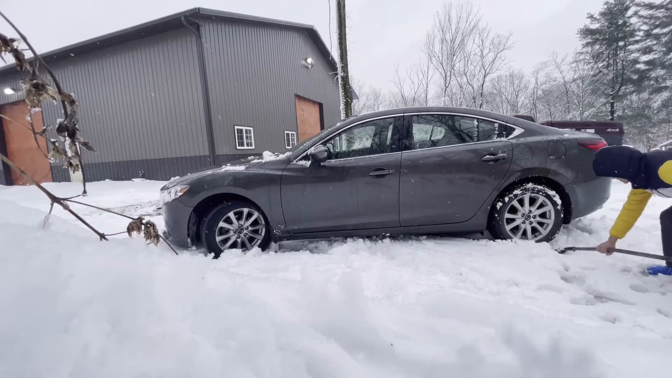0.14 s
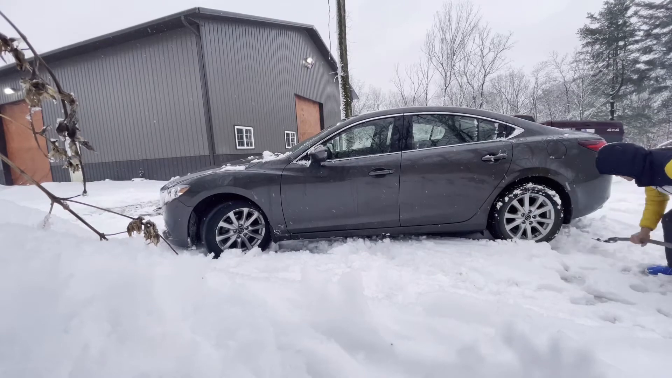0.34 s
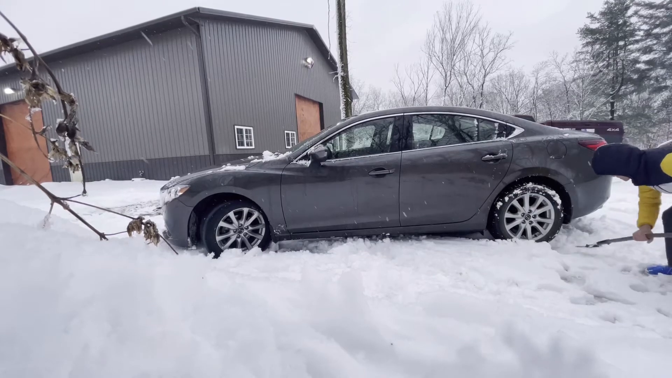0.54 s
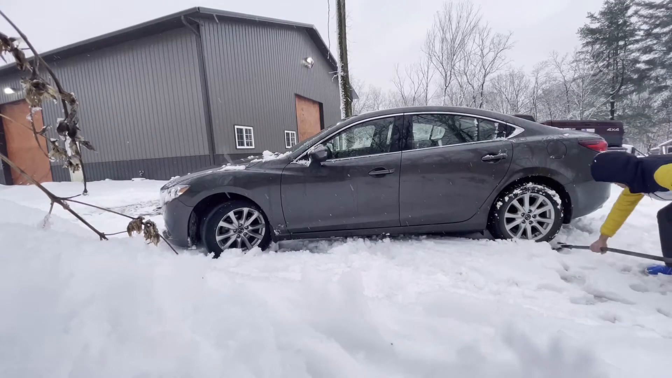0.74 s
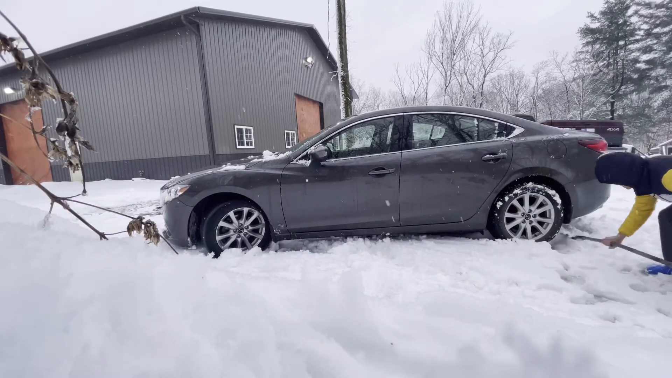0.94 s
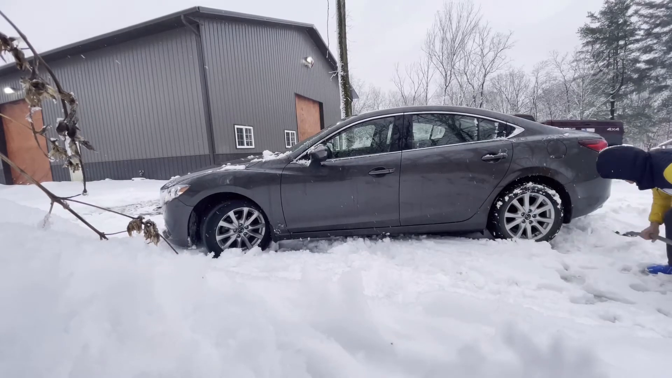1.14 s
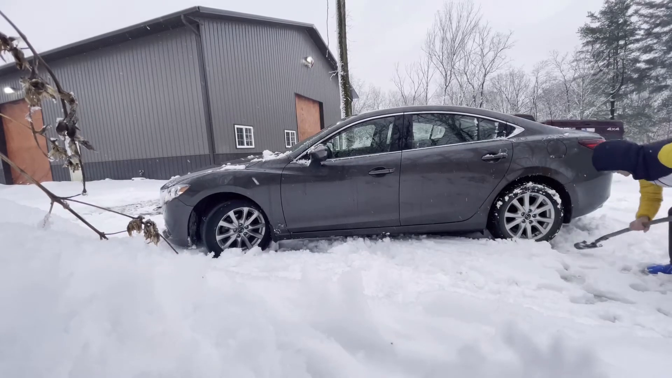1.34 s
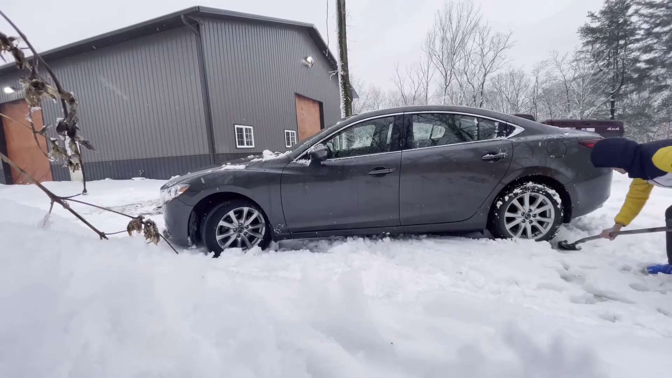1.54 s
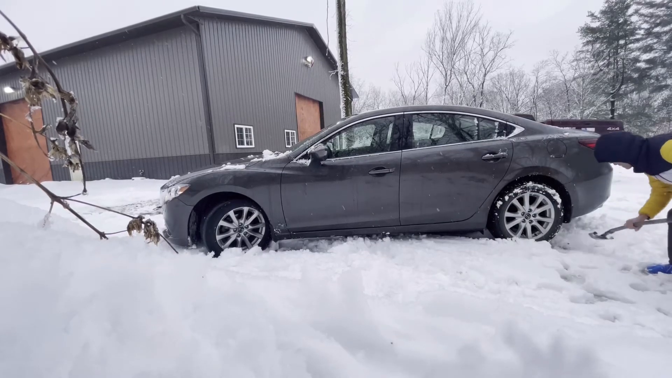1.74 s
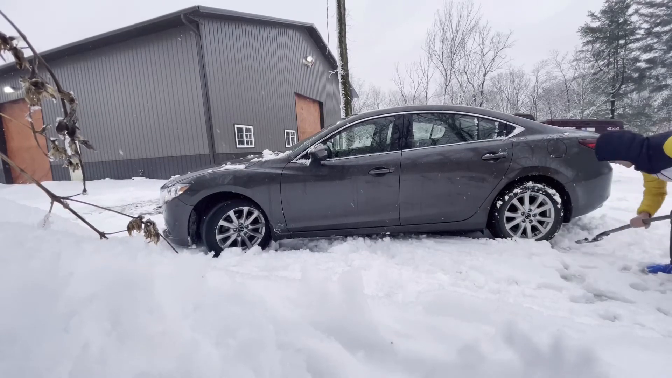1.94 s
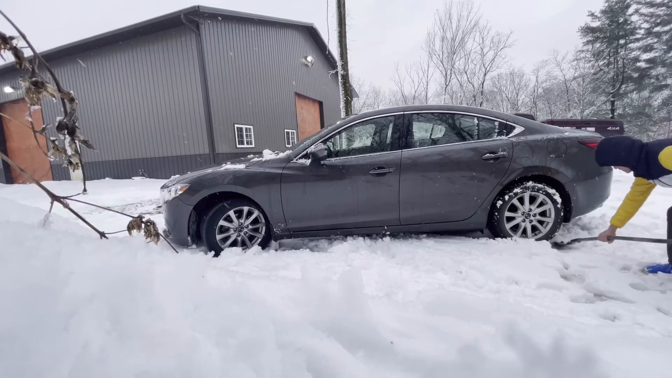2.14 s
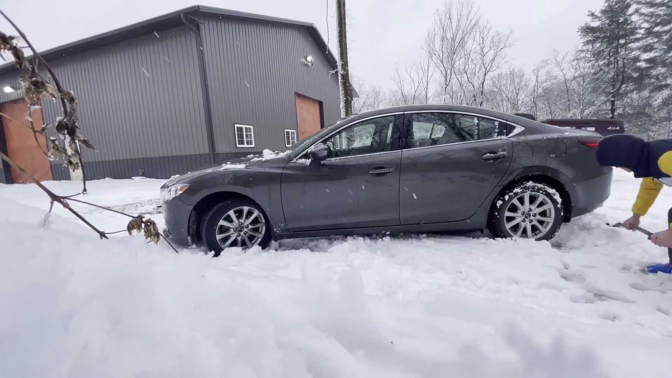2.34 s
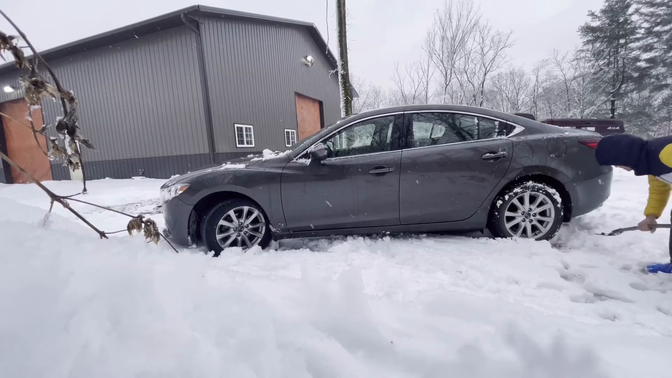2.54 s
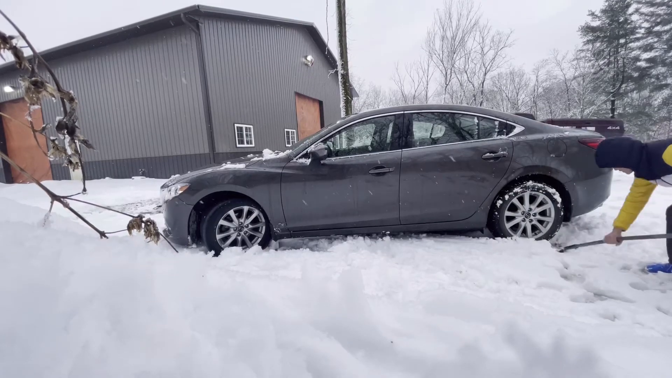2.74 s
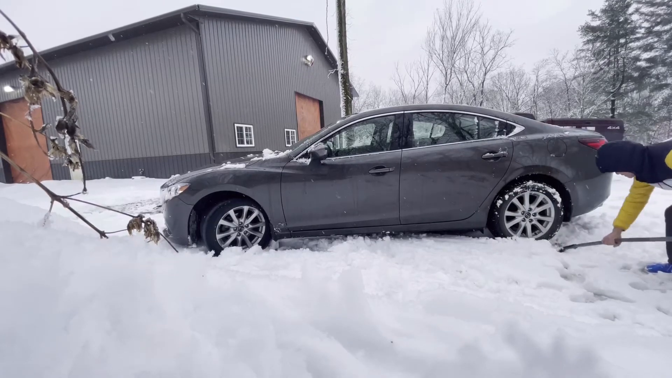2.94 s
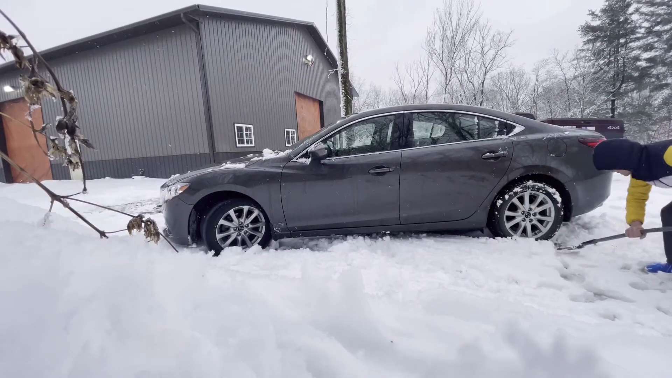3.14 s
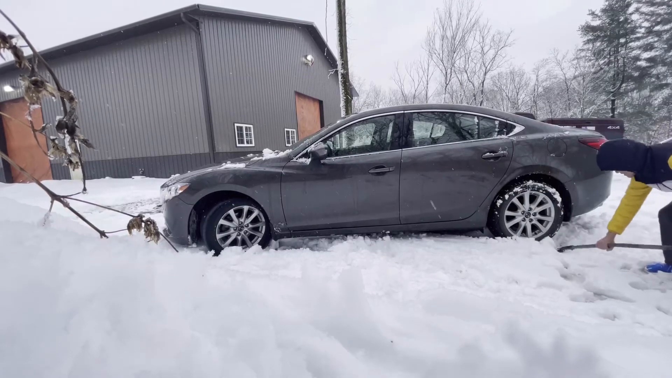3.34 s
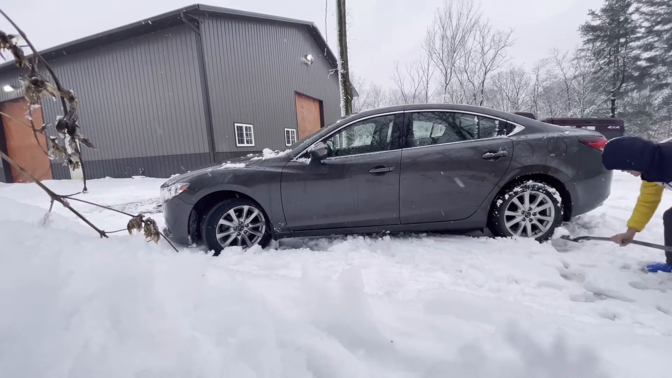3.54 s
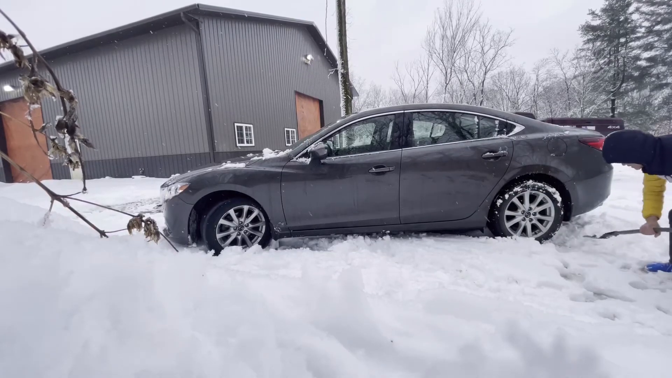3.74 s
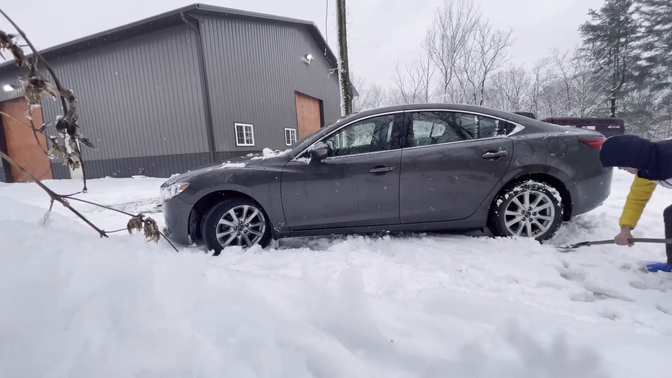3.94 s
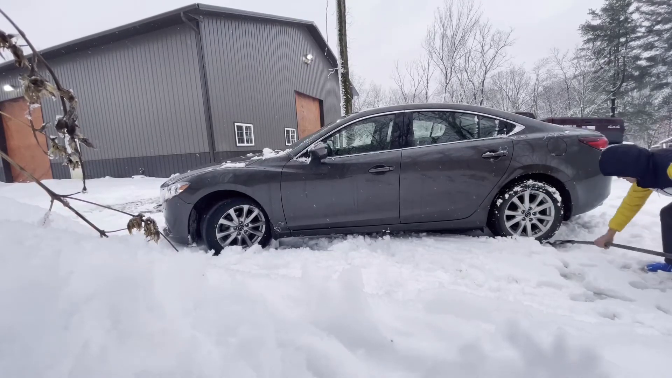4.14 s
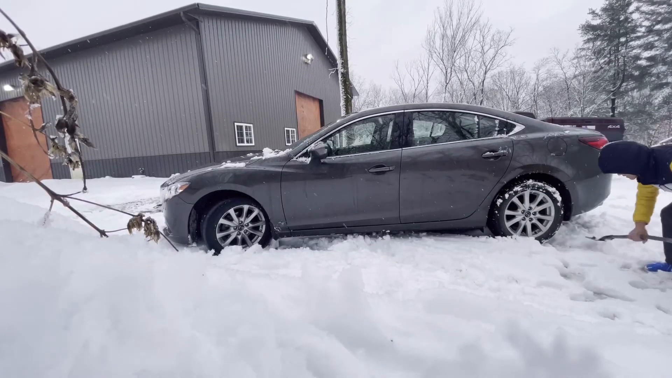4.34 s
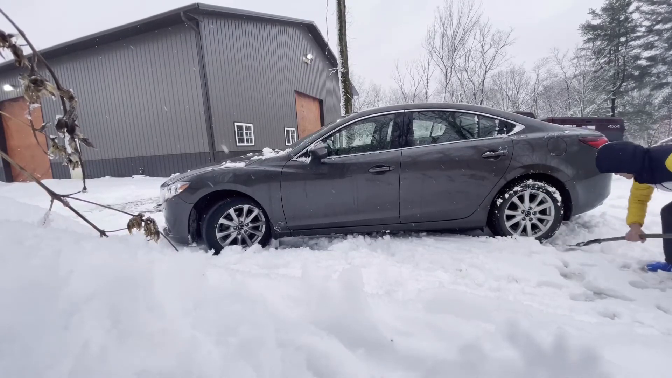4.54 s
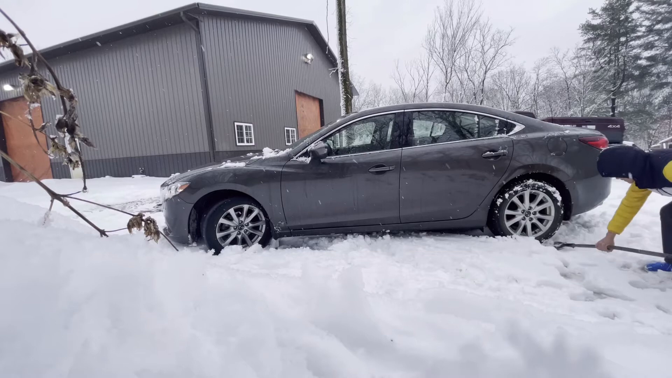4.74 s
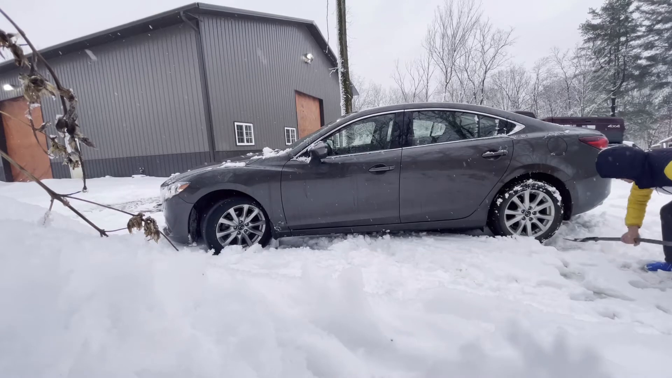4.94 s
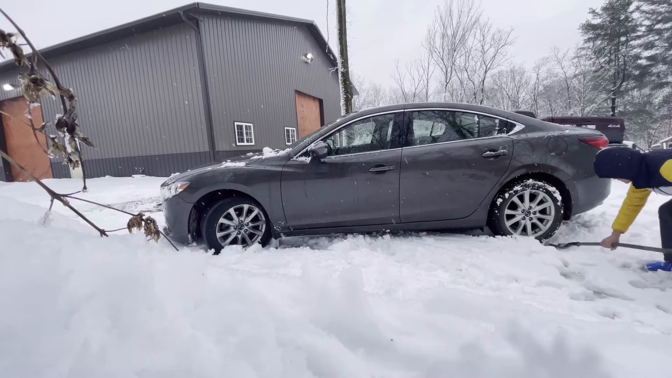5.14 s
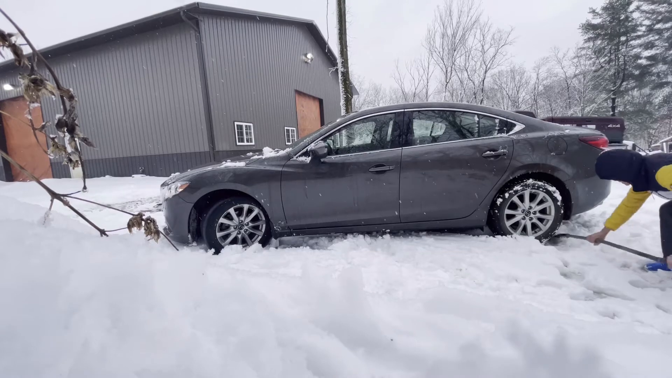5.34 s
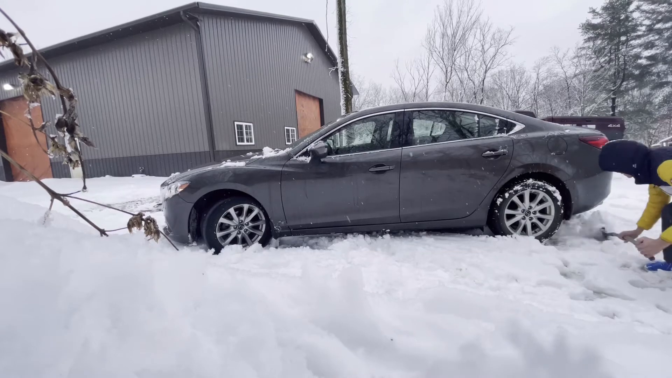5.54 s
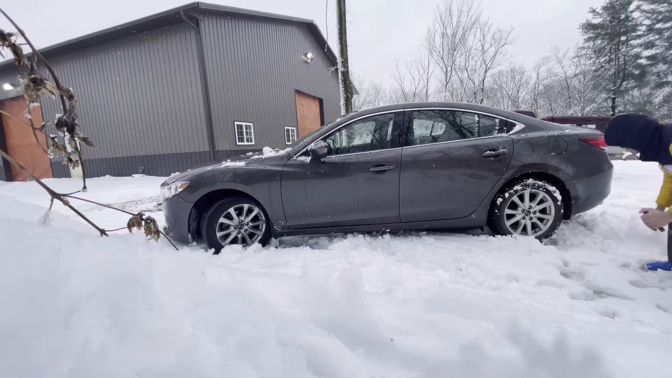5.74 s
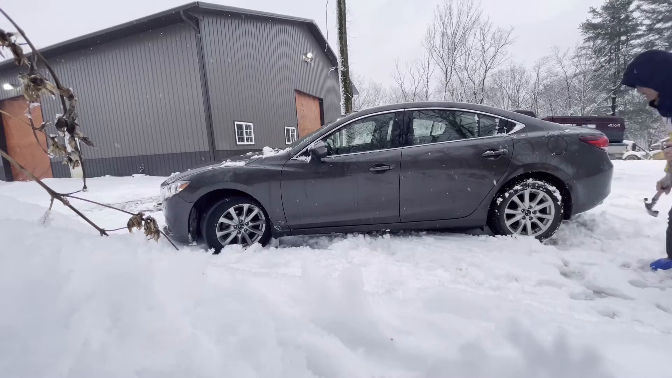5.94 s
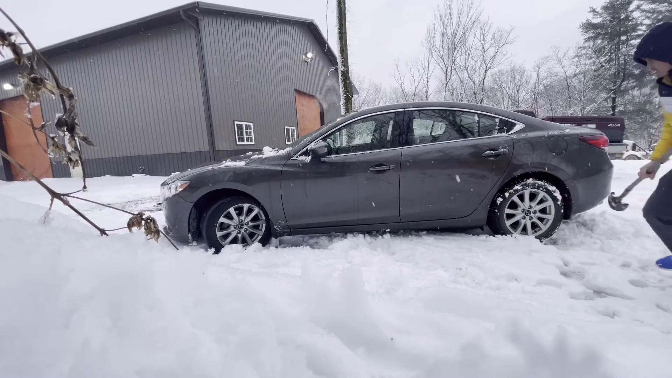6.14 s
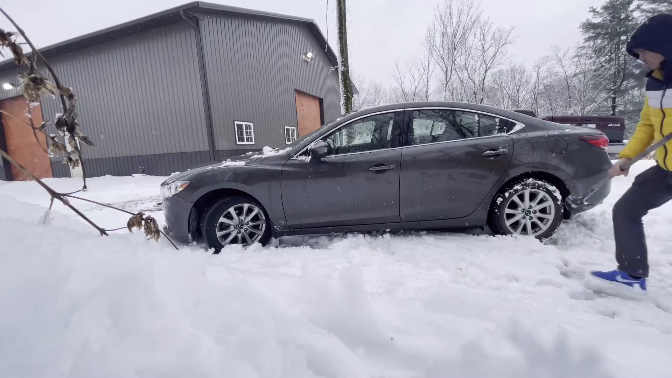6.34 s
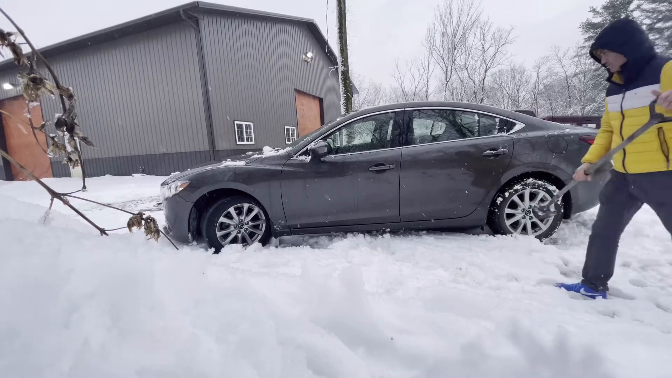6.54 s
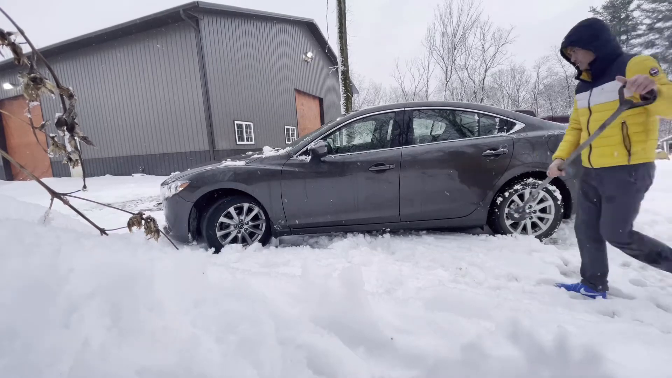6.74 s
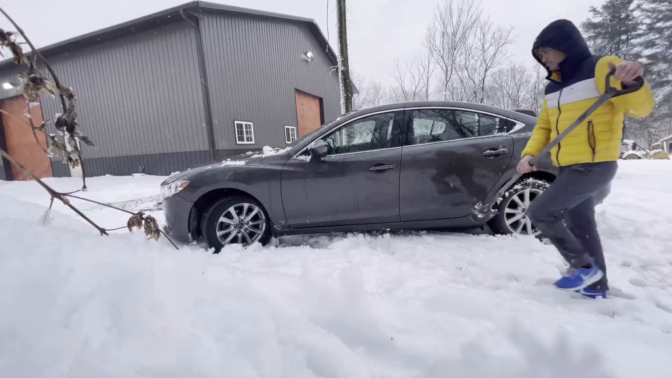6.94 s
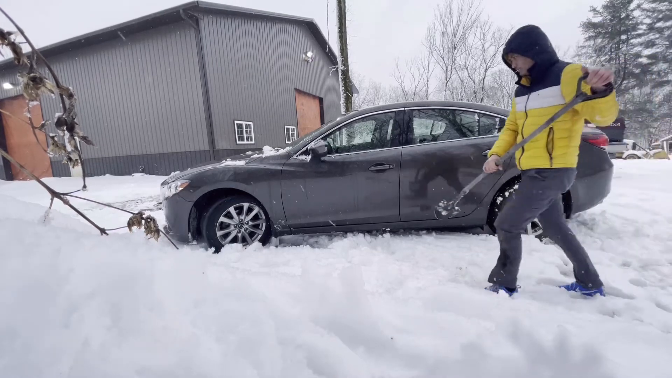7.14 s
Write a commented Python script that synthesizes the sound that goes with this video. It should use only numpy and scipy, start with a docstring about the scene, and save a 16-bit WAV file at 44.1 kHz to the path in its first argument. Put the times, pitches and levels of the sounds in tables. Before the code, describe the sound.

A shovel digs around a stuck car in snow. Each thrust is a sudden crisp crack of icy grains with a short metallic ring and a low knock, sometimes doubled, with short raspy scrapes between. The engine idles underneath throughout, low and humming with soft noise. At the end only muffled snow steps, light jacket rustle and the idle remain. Stereo pickup in the open air, digging toward the right, little echo.

```python
"""A car engine idles throughout, and from the start a small metal shovel scrapes and chops packed snow.
The idle is a set of exhaust tones, a fan tone and throbbing noise; the digging comes from the right.
Each thrust is a crunch of tiny random fractures, a ringing blade and a dull thud; scrapes hiss between them.
Steps crump and clothes swish at the end; car, snow banks, shed and trees scatter a faint noisy tail."""
import sys
import numpy as np
from scipy import signal
from scipy.fft import rfft, irfft
from scipy.io import wavfile
from scipy.ndimage import uniform_filter1d

SR = 44100
rng = np.random.default_rng(int(sys.argv[2]) if len(sys.argv) > 2 else 0)


def transcribe(u):
    """Save the signal u as a 16-bit wav file named by the first command-line argument.

    u: samples, shape (n,) or (channels, n), limited to [-1, 1]; the rate is SR.
    q: integer samples, one column per channel.
    """
    v = np.clip(np.atleast_2d(u).T, -1, 1)
    q = np.round(v * 32767).astype(np.int16)
    wavfile.write(sys.argv[1], SR, q)


N = 321048
TIME = np.arange(N) / SR
FREQS = np.fft.rfftfreq(N, 1 / SR)
CLICK = signal.unit_impulse(4096)  # filtering this gives the response of a struck thing
LEAD_S = 0.008  # a burst peaks this long after it starts


def from_db(db):
    """Turn decibels into a gain."""
    return 10 ** (np.asarray(db) / 20)


def rms_one(x):
    """Scale to an rms of 1."""
    return x / np.sqrt(np.mean(x ** 2) + 1e-20)


def unit_energy(response):
    """Scale an impulse response so that it keeps the power of white noise."""
    return response / np.linalg.norm(response)


def at_hz(points, hz=FREQS):
    """Read a (frequency, value) table along a logarithmic frequency axis."""
    table_hz, value = np.transpose(points)
    return np.interp(np.log(hz + 1), np.log(table_hz + 1), value)


def drift(rate_hz):
    """Slow random wandering with an rms of 1; changes faster than rate_hz are weakened."""
    spectrum = rfft(rng.standard_normal(N)) / (1 + (FREQS / rate_hz) ** 2)
    return rms_one(irfft(spectrum, N))


def band(x, low_hz, high_hz, order=2):
    """Keep mainly the sound between two frequencies."""
    edges = [low_hz, min(high_hz, 0.45 * SR)]
    return signal.sosfilt(signal.butter(order, edges, "band", fs=SR, output="sos"), x + 1e-18)


def resonate(x, hz, width_hz):
    """One resonance, with a gain of about 1 at its peak; a narrower one rings longer."""
    r = np.exp(-np.pi * width_hz / SR)
    top = np.array([1, 0, -1]) * (1 - r * r) / 2
    bottom = [1, -2 * r * np.cos(2 * np.pi * hz / SR), r * r]
    return signal.lfilter(top, bottom, x + 1e-18)


def blend(pair, likeness):
    """Left and right spectra, mixed from two unrelated signals to a given likeness."""
    alike = np.clip(at_hz(likeness), -0.99, 0.99)
    shared, opposed = rfft(pair)
    opposed = np.sqrt(1 - alike) * opposed * [[1], [-1]]
    return (np.sqrt(1 + alike) * shared + opposed) / np.sqrt(2)


def left_leads(spectra, phase):
    """Turn spectra into sound, with the left side ahead by a phase that depends on frequency."""
    lead = np.interp(FREQS, *np.transpose(phase)) * [[1], [0]]
    return irfft(spectra * np.exp(1j * lead), N)


def grains(spread_db, size=N):
    """Two streams of tiny fractures of very uneven size, with an rms of 1."""
    size_db = spread_db * np.minimum(rng.exponential(1, (2, size)), 4)
    return rms_one(rng.standard_normal((2, size)) * from_db(size_db))


def swell(t, swell_s, fade_s):
    """Gain of a movement fastest at t = 0: it climbs 20 dB in swell_s and sinks 20 dB in fade_s."""
    return from_db(-20 * np.maximum(-t / max(swell_s, 1e-3), t / max(fade_s, 1e-3)))


def burst(response, rise_s, t60, spread_db, size=12288):
    """Fractures build up, peak and die away, each exciting the response; loudest 10 ms at rms 1."""
    t = np.arange(size) / SR - LEAD_S
    rise = np.exp(np.minimum(t, 0) / max(rise_s, 1e-4))
    force = rise * from_db(-60 * np.maximum(t, 0) / t60)
    sound = signal.fftconvolve(force * grains(spread_db, size), response[None], axes=1)[:, :size]
    power = uniform_filter1d(sound ** 2, size=441)
    return sound / np.sqrt(power.max(axis=1, keepdims=True))


def add(out, sound, s):
    """Mix a sound in, starting at time s."""
    start = round(s * SR)
    out[:, start:start + sound.shape[1]] += sound[:, :N - start]


# how fast the engine fires: (time [s], rate [firings per s])
FIRING_RATE = [(0, 27.5), (1.0, 27.37), (1.7, 27.28), (2.4, 27.13), (3.1, 27.29), (3.8, 27.58),
               (4.5, 27.44), (5.2, 27.57), (5.9, 27.43), (7.28, 27.6)]
# exhaust tones: (multiple of the firing rate [-], level before the slow waver [dB rms])
EXHAUST_TONES = [(1, -44), (2, -52), (3, -38), (4, -57.5), (5, -57), (6, -53), (8, -58.5)]
FAN_HZ, FAN_DB = 74.2, -45.5  # level in dB rms
# tone colour of engine rumble and outdoor hiss: (frequency [Hz], relative level [dB per Hz])
RUMBLE_COLOUR = [(25, -22), (44, -5), (58, -0.5), (100, 0.5), (190, 0.5), (290, -7.5), (400, -14.5),
                 (520, -18), (800, -23), (1600, -26.5), (2600, -35), (4700, -35), (9500, -40.5),
                 (13000, -39), (15500, -48.5)]
RUMBLE_DB = -39  # rms, before the throb and the left-right balance
# how alike the rumble is on both sides: (frequency [Hz], correlation [-])
RUMBLE_ALIKE = [(60, .8), (130, .9), (290, .86), (640, .45), (1500, .3), (3000, .35), (7000, .15),
                (11000, .15), (13000, .9)]
# the engine lies to the left: (frequency [Hz], lead of the left side [radians])
RUMBLE_LEAD = [(0, 0), (430, .2), (780, 1.7), (1720, 1.7), (2500, 3.2), (4570, 6.1), (12000, 6.28)]


def engine(waver_db=1.06, throb=0.16):
    """Exhaust tones locked to the firings, a fan tone beating against them, and throbbing rumble."""
    s, firings = np.transpose(FIRING_RATE)
    phase = 2 * np.pi * np.cumsum(np.interp(TIME, s, firings)) / SR
    tones = from_db(FAN_DB) * np.sin(2 * np.pi * (FAN_HZ * TIME + rng.random()))
    for multiple, db in EXHAUST_TONES:
        gain = from_db(db + waver_db * drift(rate_hz=0.66))
        tones += gain * np.sin(multiple * phase + rng.uniform(0, 2 * np.pi))
    noise = blend(rng.standard_normal((2, N)), RUMBLE_ALIKE) * from_db(at_hz(RUMBLE_COLOUR))
    rumble = rms_one(left_leads(noise, RUMBLE_LEAD))
    # the middle of the rumble swells with each firing
    rumble += throb * np.cos(phase) * band(rumble, low_hz=120, high_hz=555)
    # the tones reach the left side slightly ahead
    tones = left_leads(rfft(tones), [(0, 0.25), (SR / 2, 0.25)])
    balance = from_db([[0.6], [-0.6]])  # rumble a little louder on the left
    return np.sqrt(2) * tones + from_db(RUMBLE_DB) * rumble * balance


def outdoors(x, tail_db=-22, t60=0.44, near_db=-13, near_t60=0.12, size=32768):
    """Quick scatter from the car's flank and the snow banks, then a faint tail from shed and trees."""
    t = np.arange(size) / SR
    noise = band(rng.standard_normal((2, size)), low_hz=402, high_hz=7860, order=1)
    scatter = noise * (t > 0.006)  # the far tail comes back only after 6 ms; the near scatter, turned round, starts at once
    tail = scatter * from_db(-60 * t / t60)
    near = scatter[::-1] * from_db(-60 * t / near_t60)
    response = from_db(tail_db) * unit_energy(tail) + from_db(near_db) * unit_energy(near)
    return signal.fftconvolve(x, response, axes=1)[:, :N]


# how far the left side is ahead for the digging: (frequency [Hz], lead [radians])
DIG_LEAD = [(0, 0), (780, -2.9), (1030, -1.7), (2070, -1.8), (4050, -4.3), (5170, -5.1), (6200, -0.9),
            (6720, -1.5), (7670, 0.5), (8440, 3.2), (9990, 4.9), (10600, 2.9), (12600, -0.0), (16200, -0.0)]
# how much louder the digging is on the left: (frequency [Hz], left minus right [dB])
DIG_LEFT_RIGHT = [(200, -1), (450, -4), (700, 2.5), (950, -14.5), (1250, -3.5), (1700, -6.5), (2150, -2.5),
                  (3200, -1), (5200, 1), (6400, 3), (8300, -1.5), (12500, 1)]
# how alike the digging is on both sides: (frequency [Hz], correlation [-])
DIG_ALIKE = [(200, 0.9), (2000, 0.98), (5000, 0.78), (9000, 0.36), (11000, 0.85), (13000, 1)]


def from_the_right(pair):
    """The two microphone ports hear the digging with different delay and shading."""
    shade = from_db(at_hz(DIG_LEFT_RIGHT) * np.array([[0.5], [-0.5]]))
    shade /= np.sqrt(np.mean(shade ** 2, axis=0))
    return left_leads(blend(pair, DIG_ALIKE) * shade, DIG_LEAD)


# jacket and boots swish at each stride: (time [s], level before the trim [dB])
STRIDE_SWISHES = [(6.41, -55), (6.8, -54), (7.02, -54), (7.22, -55)]


def swish(trim_db=-4, rustle_db=3.7, swell_s=0.08, fade_s=0.17):
    """Fabric rubs and loose snow is kicked up with each stride: a faint, uneven, bright hiss."""
    level = sum(from_db(db + trim_db) * swell(TIME - s, swell_s, fade_s) for s, db in STRIDE_SWISHES)
    hiss = rms_one(band(grains(spread_db=7), low_hz=3200, high_hz=15200, order=1))
    return level * from_db(rustle_db * drift(rate_hz=35)) * hiss


# a lump of snow drops: (time [s], starting level [dB], pitch [Hz])
FALLING_LUMP = (2.232, -22, 85)


def clod(t60=0.24):
    """A heavy lump lands with one deep, short boom: a low tone that dies away."""
    s, db, hz = FALLING_LUMP
    t = np.maximum(TIME - s, 0)
    return from_db(db - 60 * t / t60) * np.sin(2 * np.pi * hz * t)


# dull knocks and footfalls, levels before the trims:
# (time [s], crump level [dB], crump centre [Hz], thump level [dB])
FOOTFALLS = [(2.221, -26.5, 1310, -29), (5.213, -29, 503, -35), (5.454, -34.5, 413, -27.5),
             (5.806, -26, 510, -30), (6.296, -31.5, 400, -42), (6.882, -36, 524, -32),
             (6.993, -33.5, 540, -29.5)]


def tramps(grit_db=-19, crump_trim_db=-5, thump_trim_db=-4):
    """Packed snow gives way with a short hollow crump over a soft thump."""
    out = np.zeros((2, N))
    thump = band(CLICK, low_hz=108, high_hz=253)
    grit = band(CLICK, low_hz=910, high_hz=1500, order=3)
    for s, crump_db, hz, thump_db in FOOTFALLS:
        hollow = band(CLICK, hz * 0.91, hz * 1.195) + from_db(grit_db) * grit
        crump = burst(hollow, rise_s=0.0017, t60=0.038, spread_db=4.5)
        low = burst(thump, rise_s=0.0017, t60=0.17, spread_db=5)
        add(out, from_db(crump_db + crump_trim_db) * crump, s - LEAD_S)
        add(out, from_db(thump_db + thump_trim_db) * low, s - LEAD_S)
    return out


# ring of the blade, before each contact varies it:
# (frequency [Hz], width [Hz], level above the plain contact noise [dB])
BLADE_RING = [(872, 59, 10), (933, 120, 7), (1094, 28, 13.5), (1304, 40, 9), (1344, 56, -0.5),
              (1686, 49, 9), (1807, 73, 5.5), (2142, 44, 10.5), (2990, 110, 5), (4060, 57, 7.5),
              (5112, 117, 10.5), (6350, 280, 15.5), (6560, 120, 12), (6700, 17, 14), (8120, 190, 11)]
# tone colour of breaking snow crystals: (frequency [Hz], relative level [dB per Hz])
CRUNCH_COLOUR = [(1700, -20), (2200, -6.5), (2900, 0.5), (3700, -1), (4400, 5), (5600, -2), (6600, -3.5),
                 (8500, -3), (10500, -0.5), (13000, -2.5), (15000, -9), (16500, -35)]


def blade_responses(clang_hz, ring_db, brightness_db, spread_db=1.0, sustain=0.25, focus=1.16):
    """Crunch, clang and rim clink of one contact; a blade with less snow on it rings louder and longer."""
    ring_db = np.clip(ring_db, -8, 6)
    strengths = from_db(ring_db + spread_db * rng.standard_normal(len(BLADE_RING)))
    damping = from_db(-sustain * ring_db)
    blade = CLICK.copy()
    for strength, (hz, width_hz, db) in zip(strengths, BLADE_RING):
        blade += strength * (from_db(db) - 1) * resonate(CLICK, hz, width_hz * damping)
    # snow colour, tilted by brightness_db for each octave above the table's first frequency
    hz = np.linspace(0, SR / 2, 257)
    octaves = np.log2(np.maximum(hz / CRUNCH_COLOUR[0][0], 1))
    colour = from_db(at_hz(CRUNCH_COLOUR, hz) + brightness_db * octaves)
    crunch = signal.lfilter(signal.firwin2(65, hz, colour, fs=SR), 1, blade)
    clang = band(blade, low_hz=714, high_hz=2030, order=3)
    clang += focus * resonate(clang, clang_hz, width_hz=420)
    rim = band(blade, low_hz=1920, high_hz=3280, order=3)
    return unit_energy(crunch), unit_energy(clang), unit_energy(rim)


# pushes, drags and scoops through the snow, levels before the trims:
# (time of fastest movement [s], hiss level [dB], blade rasp level [dB],
#  swell by 20 dB [s], fade by 20 dB [s])
SNOW_SCRAPES = [(0.059, -45, -46, .014, 0.12), (0.125, -41.5, -52, 0.13, 0.043),
                (0.875, -52, -61, .05, .05), (0.98, -52.5, -54, .06, 0.073),
                (1.422, -28.5, -41, 0.022, 0.011), (1.598, -33, -44, 0.07, 0.051),
                (2.245, -46, -48, 0.14, 0.18), (2.712, -32, -43, 0.023, 0.063),
                (3.154, -31, -43, 0.023, .015), (3.38, -45, -47, 0.032, 0.065),
                (3.491, -48.5, -62, .03, 0.025), (4.036, -36, -37.5, 0.045, 0.044),
                (4.135, -48.5, -57, 0.12, .08), (4.203, -44.5, -68, .05, 0.032),
                (4.328, -49.5, -70, 0.02, .03), (4.733, -45, -47.5, 0.21, .028),
                (5.087, -29.5, -31, 0.015, 0.019), (5.211, -38, -43, 0.083, .08),
                (5.37, -46, -59, 0.25, 0.14), (5.454, -34.5, -38.5, 0.073, 0.061),
                (5.545, -49, -61, .06, .08)]
# after a strike the blade slides on and is braked by the snow; swell and fade are for 20 dB
SLIDE_LAG_S, SLIDE_SWELL_S, SLIDE_FADE_S = 0.018, 0.007, 0.075
SLIDE_RASP_DB = -5.5  # blade rasp against the hiss of the slide, before the trims


def scrapes(hiss_trim_db=-1, rasp_trim_db=-2, rim_db=-8):
    """The blade sticks and slips through hissing grains and rings, in scrapes and after strikes."""
    out = np.zeros((2, N))
    judder = from_db(2.8 * drift(rate_hz=100))
    slides = []
    for strike in BLADE_STRIKES:
        s, slide_db = strike[0], strike[8]
        rasp_db = slide_db + SLIDE_RASP_DB
        slides.append((s + SLIDE_LAG_S, slide_db, rasp_db, SLIDE_SWELL_S, SLIDE_FADE_S))
    for s, hiss_db, rasp_db, swell_s, fade_s in SNOW_SCRAPES + slides:
        moving = (TIME > s - 0.25) & (TIME < s + 0.35)
        t = TIME[moving]
        force = judder[moving] * swell(t - s, swell_s, fade_s)
        responses = blade_responses(clang_hz=1330, ring_db=-3.0, brightness_db=-1.5)
        levels = hiss_db + hiss_trim_db, rasp_db + rasp_trim_db, rasp_db + rim_db
        for level, response in zip(levels, responses):
            drive = force * from_db(level) * grains(spread_db=3.5, size=len(t))
            add(out, signal.fftconvolve(drive, response[None], axes=1), t[0])
    return out


# thrusts of the blade, levels before the trims and ring before its limits:
# (time [s], crunch level [dB], clang level [dB], clang centre [Hz], rim clink level [dB],
#  knock level [dB], knock centre [Hz], thud level [dB], slide level [dB], blade ring [dB],
#  brightness [dB per octave])
BLADE_STRIKES = [(0.6284, -9.5, -22.5, 1130, -27.5, -19, 554, -32, -32.5, -4, 0.5),
                 (0.8041, -34, -48, 872, -51, -63, 328, -40, -46, -7, 0.1),
                 (0.9277, -28, -46, 1430, -71, -47, 334, -39.5, -48, 1, 2),
                 (1.4288, -4.5, -20, 1250, -46, -32, 404, -21.5, -48, 5.5, -0.5),
                 (1.4444, -17, -38, 1640, -41, -33, 283, -29, -48, -5, -4),
                 (1.476, -24, -52, 1020, -48, -56, 318, -53, -56, 7, -4),
                 (2.0546, -8, -22, 1130, -30, -30.5, 278, -27.5, -40, -1, -2.5),
                 (2.074, -8, -20, 1090, -19, -29.5, 470, -33, -28.5, 4, 3.5),
                 (2.397, -39.5, -70, 770, -66, -61, 353, -42.5, -66, -8, 18),
                 (2.7321, -18.5, -28.5, 1310, -33, -38, 285, -31.5, -55, -8, 0.5),
                 (3.1619, -10, -19.5, 820, -34, -16, 372, -22, -35.5, -6, -4),
                 (3.9531, -14, -24, 1350, -28.5, -28, 496, -27.5, -27, 0, 2),
                 (4.582, -13.5, -20.5, 1030, -27, -25, 480, -24.5, -30.5, -3.5, 0),
                 (5.0948, -8, -26.5, 1000, -30.5, -31.5, 500, -37, -28.5, -9, -0.5),
                 (5.141, -15.5, -33, 1090, -49, -33, 316, -31.5, -37, 3, 0.5),
                 (5.648, -35.5, -59, 775, -53, -63, 288, -55, -54, -8, 0.1)]
CRUSH_T60_S = 0.062  # the crust gives way equally fast under every strike


def strikes(crunch_trim_db=-11, clang_trim_db=1, knock_trim_db=1, body_lag_s=0.001206):
    """The edge cracks the crust first; blade and ground answer a moment later."""
    ground = band(CLICK, low_hz=270, high_hz=687, order=3)
    thud = band(CLICK, low_hz=134, high_hz=229)
    out = np.zeros((2, N))
    for (s, crunch_db, clang_db, clang_hz, rim_db, knock_db, knock_hz, thud_db,
         _, ring_db, brightness_db) in BLADE_STRIKES:
        crunch, clang, rim = blade_responses(clang_hz, ring_db, brightness_db)
        knock = ground + 1.3 * resonate(ground, knock_hz, width_hz=69)
        crack = burst(crunch, rise_s=0.0034, t60=CRUSH_T60_S, spread_db=7)
        add(out, from_db(crunch_db + crunch_trim_db) * crack, s - LEAD_S)
        body = from_db(clang_db + clang_trim_db) * burst(
            clang, rise_s=0.00074, t60=1.04 * CRUSH_T60_S, spread_db=1.5)
        body += from_db(rim_db) * burst(rim, rise_s=0.0011, t60=1.3 * CRUSH_T60_S, spread_db=2.5)
        body += from_db(knock_db + knock_trim_db) * burst(
            knock, rise_s=0.00087, t60=0.059, spread_db=4.0)
        body += from_db(thud_db) * burst(thud, rise_s=0.0012, t60=0.077, spread_db=3.5)
        add(out, body, s - LEAD_S + body_lag_s)
    return out


def scene():
    """Digging and footsteps in the yard, over the idling engine."""
    digging = from_the_right(swish() + clod() + tramps() + scrapes() + strikes())
    return engine() + outdoors(digging) + digging


CUTOFF_HZ = 16000


def record(dry):
    """Cut the top of the treble steeply."""
    return signal.sosfilt(signal.ellip(10, 0.1, 80, CUTOFF_HZ, fs=SR, output="sos"), dry)


dry = scene()
out = record(dry)
transcribe(out)
```